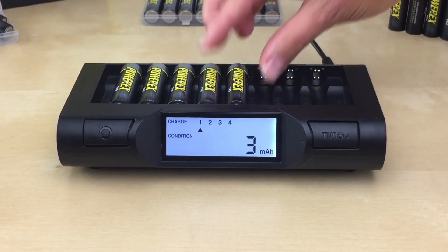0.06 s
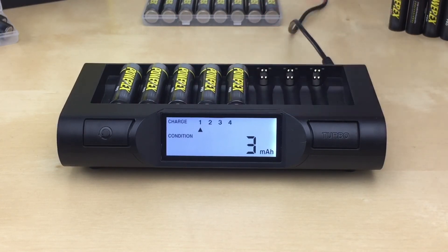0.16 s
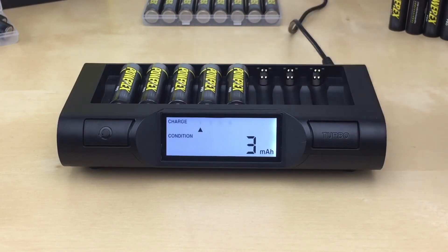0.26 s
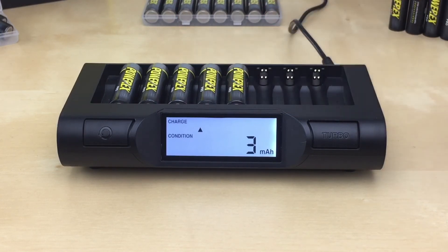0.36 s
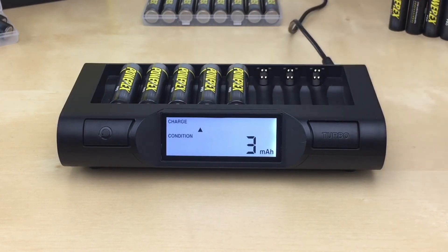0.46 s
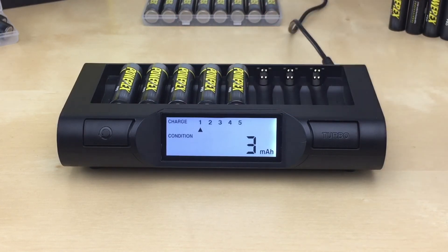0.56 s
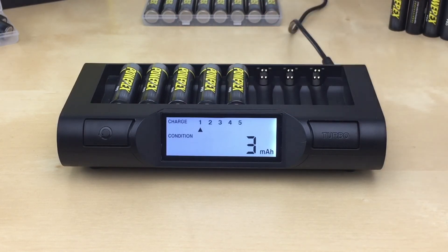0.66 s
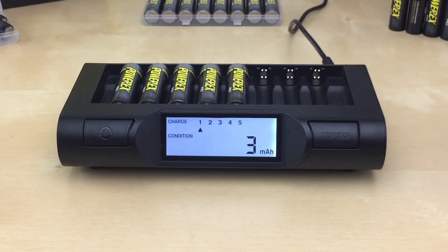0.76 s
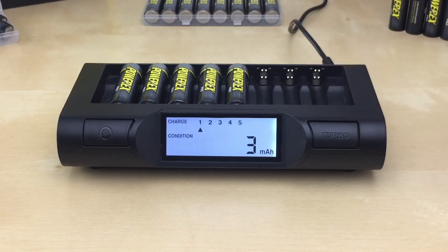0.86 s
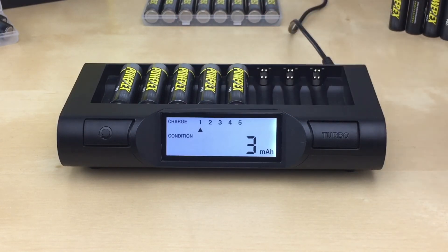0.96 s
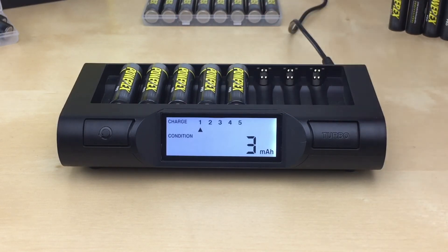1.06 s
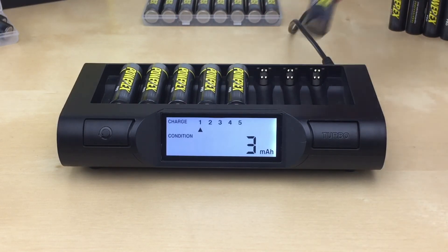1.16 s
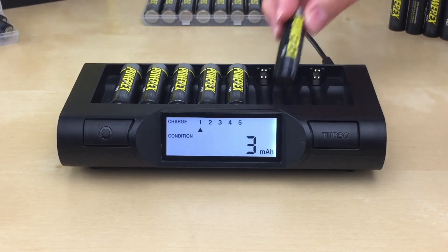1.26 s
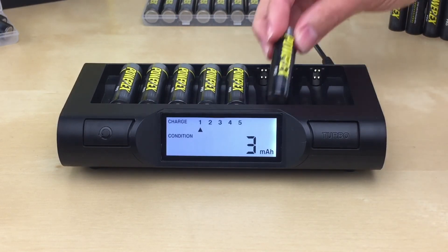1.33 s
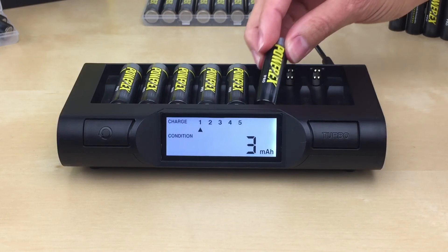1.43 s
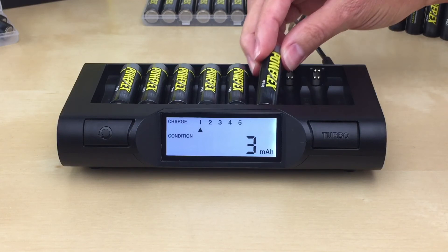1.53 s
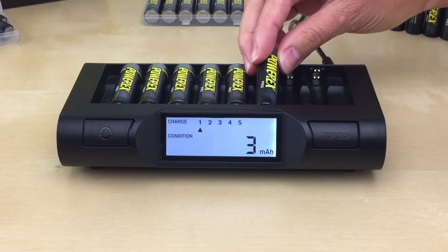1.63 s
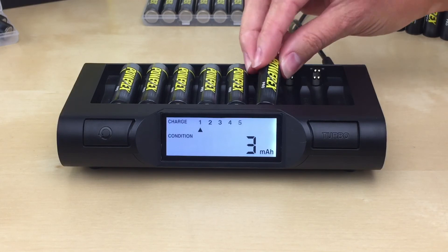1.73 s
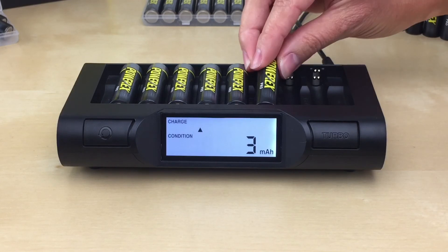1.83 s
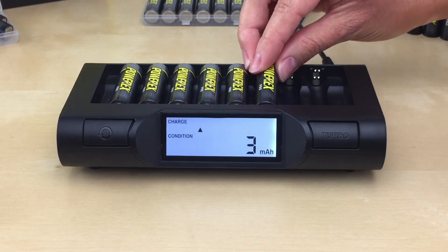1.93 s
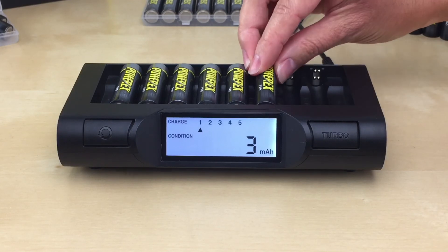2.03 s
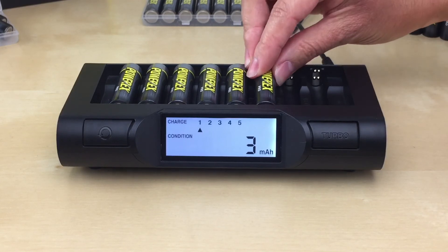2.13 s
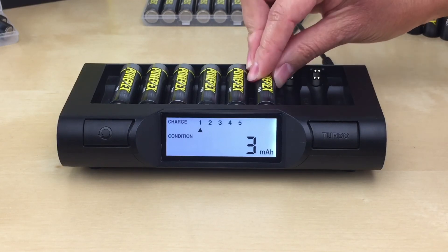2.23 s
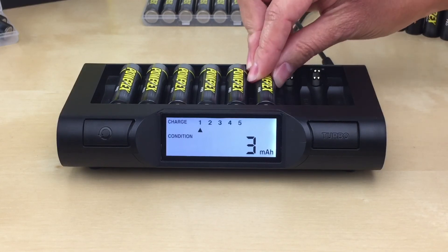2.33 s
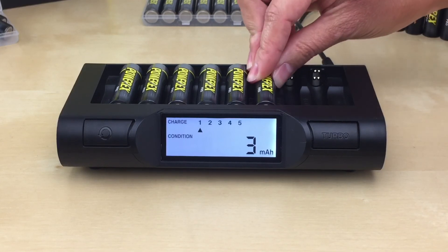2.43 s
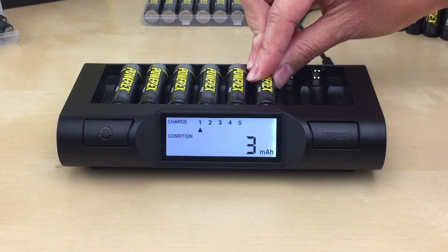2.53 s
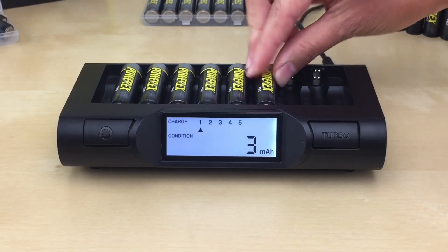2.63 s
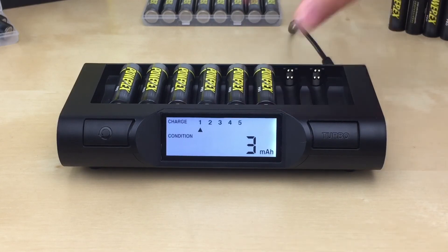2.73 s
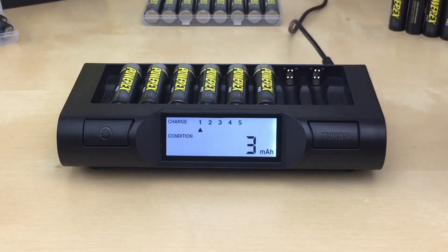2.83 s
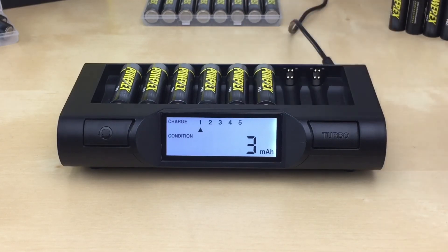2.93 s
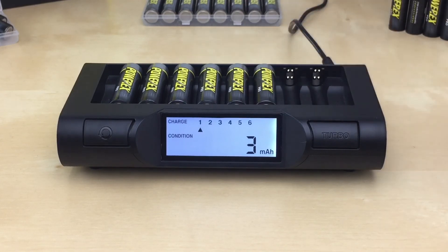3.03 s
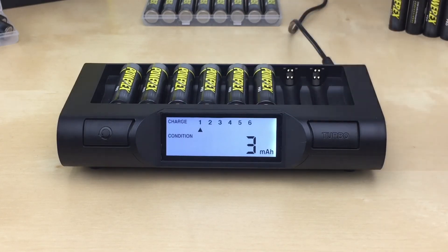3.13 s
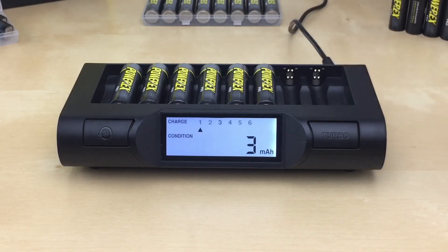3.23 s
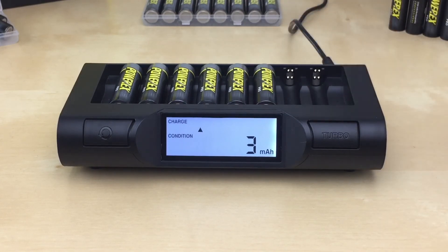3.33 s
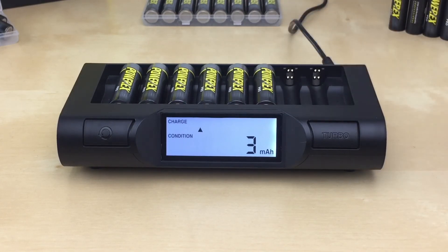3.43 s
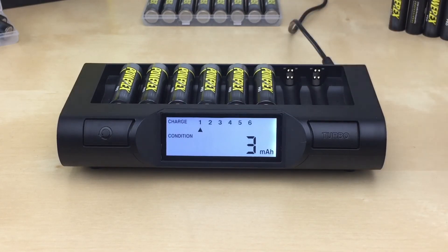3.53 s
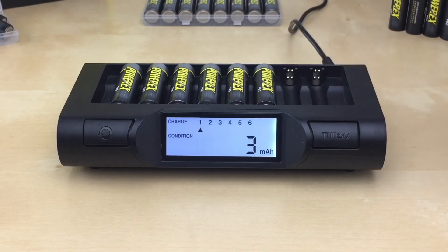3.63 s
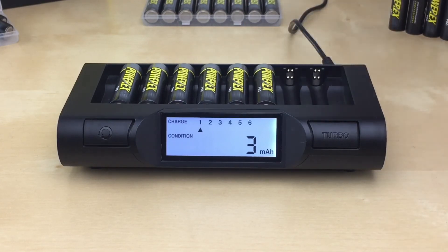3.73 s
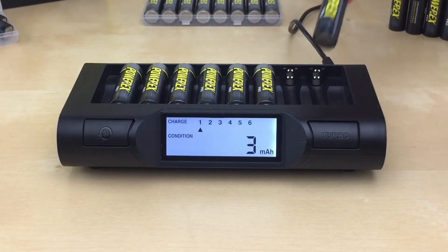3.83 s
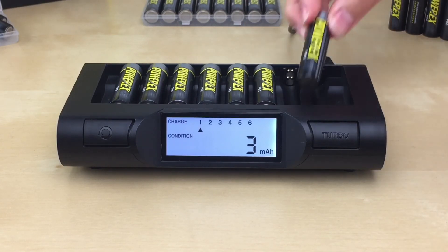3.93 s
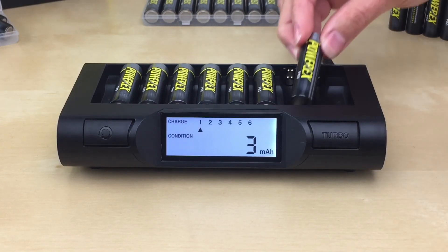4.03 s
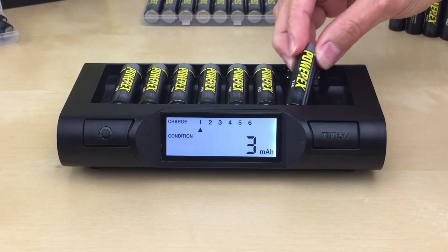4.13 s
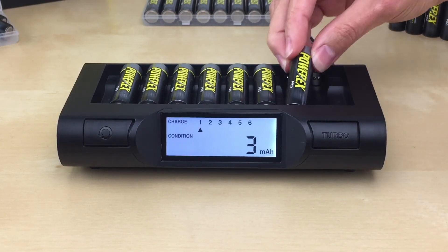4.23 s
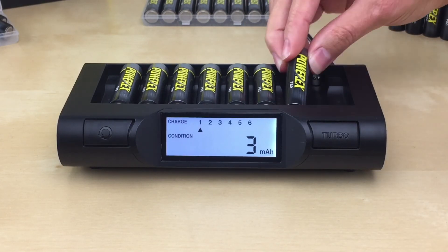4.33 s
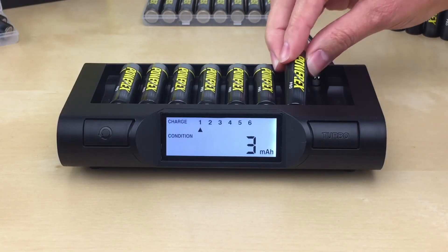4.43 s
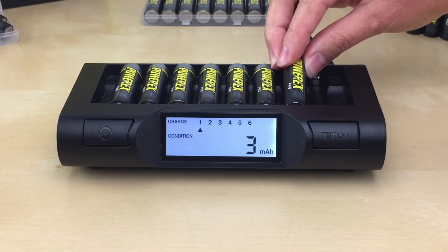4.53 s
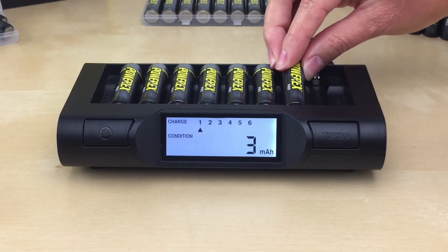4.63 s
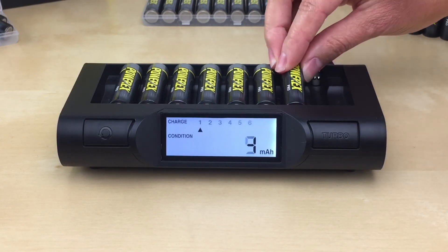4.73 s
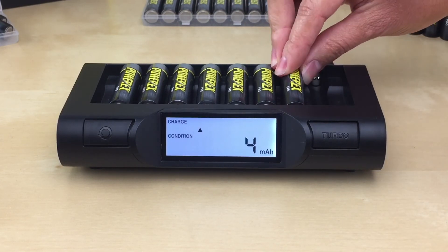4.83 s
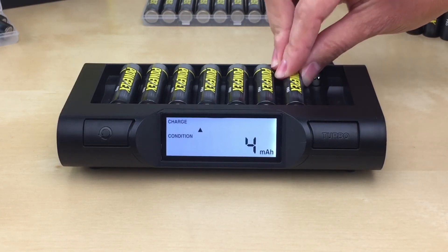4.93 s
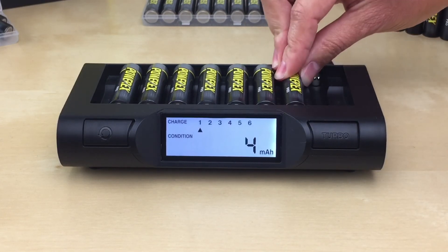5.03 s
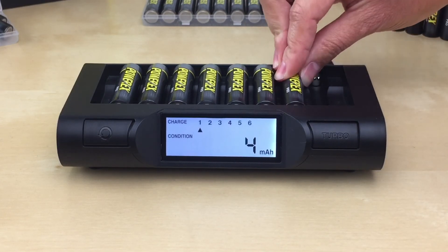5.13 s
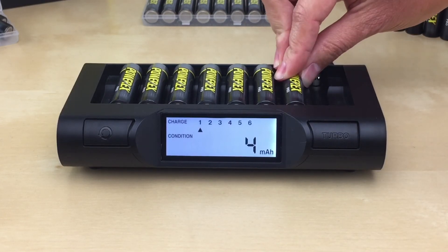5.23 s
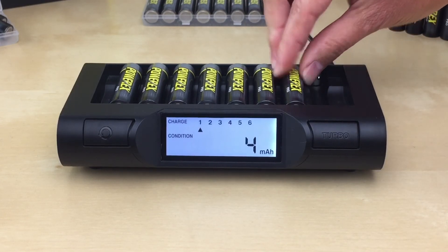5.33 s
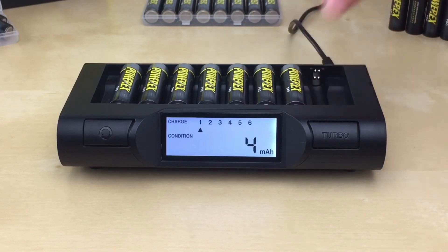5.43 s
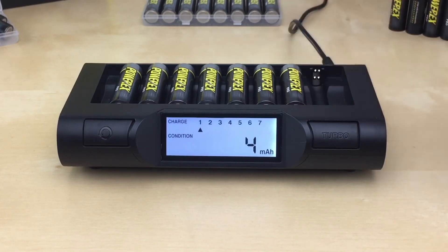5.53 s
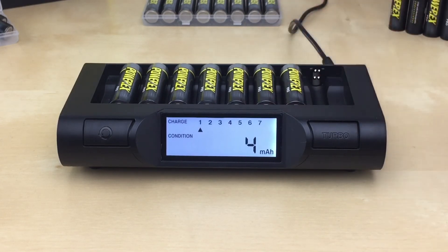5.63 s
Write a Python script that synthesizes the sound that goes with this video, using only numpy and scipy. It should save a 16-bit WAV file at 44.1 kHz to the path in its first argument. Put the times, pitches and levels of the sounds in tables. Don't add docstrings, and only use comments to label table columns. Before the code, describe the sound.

Small batteries click and snap into a plastic charger's spring contacts, with dull table thumps, over a steady faint fan whine and hiss.

```python
import sys
import numpy as np
from scipy import signal
from scipy.fft import rfft, irfft
from scipy.io import wavfile

SR = 44100
rng = np.random.default_rng(int(sys.argv[2]) if len(sys.argv) > 2 else 0)


def magnitude_from_level(level_db):
    exponent = np.asarray(level_db, float) / 20
    return 10 ** exponent


def transcribe(u):
    v = np.clip(np.atleast_2d(u).T, -1, 1)
    q = np.round(v * 32767).astype(np.int16)
    wavfile.write(sys.argv[1], SR, q)


N = 250488
TOP_CUT_HZ = 15820


def rms_one(x):
    return x / np.sqrt(np.mean(x ** 2) + 1e-20)


def ring(force, hz, t60):
    r = magnitude_from_level(-60 / (t60 * SR))
    w = 2 * np.pi * hz / SR
    return signal.lfilter([0, np.sin(w)], [1, -2 * r * np.cos(w), r * r], force + 1e-18)


def burst(seconds, rise_s, t60):
    t = np.arange(int(seconds * SR)) / SR
    rise = 1 - np.exp(-t / max(rise_s, 1e-4))
    fall_db = -60 * (t / np.clip(t60, .005, .4)) ** 1.123
    return rng.standard_normal(len(t)) * rise * magnitude_from_level(fall_db)


def drift(rate_hz):
    knots = rng.standard_normal(400)
    return np.interp(np.arange(N) / SR * rate_hz, np.arange(400), knots)


def in_time(rows):
    return np.interp(np.arange(N) / SR, *np.transpose(rows))


def band(x, low_hz, high_hz, order):
    return signal.sosfilt(signal.butter(order, [low_hz, high_hz], "band", fs=SR, output="sos"), x)


def high_pass(x, hz, order):
    return signal.sosfilt(signal.butter(order, hz, "high", fs=SR, output="sos"), x)


def add(out, sound, s):
    at = round(s * SR)
    out[at:at + len(sound)] += sound[:N - at]


def tick(mid_db, low_db, high_db, top_db, rattle_t60):
    case_modes = [780, 1050, 1400, 1950, 2280, 2750, 3370, 3900, 4500, 4950, 6300, 6960, 8100, 8900, 9500,
                  10600, 11600, 12800, 13700, 15000]
    edges = [680, 2500, 5400, 10500, 17500]
    rattle = burst(.15, 0.00013, rattle_t60)
    rattle[3] += 2.5
    luck_db = 1.2 * rng.standard_normal(len(case_modes))
    rattle += sum(magnitude_from_level(own_db - 27) * ring(rattle, hz, .005) for hz, own_db in zip(case_modes, luck_db))
    bands_db = (low_db + 4.5, 1.5, high_db + 0.21, top_db - .7)
    out = 0
    for low_hz, high_hz, rel_db in zip(edges, edges[1:], bands_db):
        out += magnitude_from_level(mid_db + rel_db) * band(rattle, low_hz, high_hz, 3)
    return out


def ticks():
    # [t/s, mid level/dB, low band against mid/dB, brightness/dB]
    touches = [(0.1592, -28.5, -8, -6.5), (0.4094, -68, 6, -14), (1.4221, -39.5, 4.5, -26),
               (1.5105, -61, 16, -15), (1.6158, -55.5, 3, 7), (2.1535, -42, -20, 5), (2.155, -50, 1, 0),
               (2.2739, -47.5, 4, -5), (2.4695, -55.5, -2, -16), (4.0936, -62.5, 11, -22),
               (4.1912, -50, -2, 5), (4.6156, -50.5, 2.5, -4), (4.8662, -44, -12, -0.5),
               (4.9836, -54.5, -13, -13), (5.0054, -43, -7, -9), (5.012, -46, -4, -17),
               (5.3787, -51.5, -12, 9.5), (5.4004, -60, 4, 7)]
    out = np.zeros(N)
    for s, mid_db, low_db, bright_db in touches:
        top_db = -3 + 1.3 * bright_db
        rattle_t60 = .031 - .0008 * bright_db
        add(out, tick(mid_db, low_db, bright_db, top_db, rattle_t60), s)
    return out


def rings():
    # [t/s, level/dB, f/Hz]
    caps = [(0.1582, -33, 1300), (1.423, -36, 580), (1.424, -31.5, 820), (.161, -35, 856),
            (0.161, -35, 4940), (1.425, -48, 2000), (1.511, -30, 900), (1.512, -37, 1500),
            (2.153, -44, 11500), (2.154, -37, 4500), (2.154, -38, 5050), (2.156, -35, 760),
            (2.153, -37, 7050), (2.157, -37, 577), (2.274, -57, 12200), (2.2755, -29, 760),
            (4.191, -43, 3900), (4.192, -52, 8300), (4.192, -50, 9960), (4.868, -52, 11550),
            (4.868, -45, 7100), (4.985, -58, 6960), (5.013, -31, 758), (5.01, -41, 3500),
            (5.008, -48, 7050)]
    # [t/s, level/dB, f/Hz]
    springs = [
        (0.1598, -31, 3400),
        (2.276, -44, 4300),
        (4.097, -48.5, 2300),
        (5.012, -41, 4500),
    ]
    # 38 ms at 1 kHz, higher parts die sooner
    parts = [(s, level_db, hz, .038 * (hz / 1000) ** -.36) for s, level_db, hz in caps]
    parts += [(s, level_db, hz, .047) for s, level_db, hz in springs]
    out = np.zeros(N)
    for s, level_db, hz, t60 in parts:
        rung = ring(burst(.2, 0.00028, 0.009), hz, t60)
        add(out, magnitude_from_level(level_db) * rung / np.abs(rung).max(), s)
    return high_pass(out, 520, 3)


def table_thumps():
    # [f/Hz, level/dB, t60/s]
    mode_groups = [
        [(52, -2, 0.21), (69.6, 6, .15)],
        [(92, -4.5, 0.064), (115.8, -2.5, 0.088)],
        [(143.3, 3.5, 0.18), (148, -6, 0.031)],
        [(213.7, 4, 0.25), (237, -12, 0.21)],
        [(281, -3, 0.11), (337.3, -2.5, 0.09), (432, -9, 0.075), (490, -18, 0.12), (568, 3.5, 0.05)],
    ]
    # [t/s, main mode level/dB, heft on low modes/dB, edge on upper modes/dB]
    knocks = [
        (1.423, -24, -42, -5),
        (1.466, -42, -22, 4),
        (1.51, -39.5, 1, -10),
        (1.809, -43, -10, -5),
        (2.154, -33.5, 2, -9),
        (2.278, -30, 7, -9),
        (4.097, -32.5, -38, -14.5),
        (4.618, -37.5, -6, -6),
        (5.005, -45.5, 18, -1.5),
    ]
    # [t/s, main mode level/dB, heft on low modes/dB, edge on upper modes/dB]
    nudges = [(0.107, -46.5, -27, -8), (1.62, -44, -15, -5), (1.929, -73, 12, 5), (1.99, -60, 6, -5),
              (2.099, -55.5, 8, 3), (2.319, -47, -4, -2.5), (2.429, -60, 0, -4), (2.721, -52.5, -20, -14),
              (4.182, -42, -20, -12), (4.258, -59, -12, 11), (4.343, -56.5, -15, -13), (4.735, -50, 0, -8),
              (4.795, -46.5, -12, -12), (4.855, -46.5, 2, -3), (5.036, -57, 13, 9), (5.128, -58, 13, -9),
              (5.409, -54, -4, -12)]
    out = np.zeros(N)
    for pushes, case_db, contact_s in ((knocks, -19, .001), (nudges, -28, .0035)):
        contact = np.hanning(round(contact_s * SR))
        for s, main_db, heft_db, edge_db in pushes:
            force = magnitude_from_level(-37) * burst(.6, 0.0058, .32)
            force[:len(contact)] += contact / contact.sum()
            deep_db = main_db - 11 + .55 * heft_db
            strongest_db = main_db + .4 * max(heft_db, 0)
            shell_db = case_db + .55 * strongest_db
            groups_db = (deep_db, main_db + heft_db, main_db, main_db + edge_db, shell_db)
            for modes, group_db in zip(mode_groups, groups_db):
                thump = sum(magnitude_from_level(group_db + level_db - 2) * ring(force, hz, t60) for hz, level_db, t60 in modes)
                add(out, band(thump, 0.62 * modes[0][0], 520, 2), s)
    return out


def slides():
    # [t/s, length/s, level/dB]
    strokes = [
        (.13, 0.047, -65),
        (1.396, 0.056, -57.5),
        (1.473, 0.07, -65),
        (2.133, .03, -63),
        (2.273, 0.035, -60),
        (4.181, .015, -58),
        (4.845, 0.036, -61),
        (4.978, 0.066, -60),
        (5.347, .06, -68),
    ]
    t = np.arange(SR // 5) / SR
    out = np.zeros(N)
    for s, length, level_db in strokes:
        hiss, grain = rng.standard_normal((2, len(t)))
        stroke = np.sin(np.pi * np.clip(t / length, 0, 1)) ** 2
        add(out, magnitude_from_level(level_db + 5.8 * grain) * hiss * stroke, s)
    return band(out, 1500, 7000, 2)


def fan_tones():
    # [t/s, speed/turns per s]
    speed = [(0, 113.02), (.9, 112.84), (2.6, 112.57), (5.68, 112.32)]
    # [t/s, level/dB]
    whine = [(0, -71), (.2, -65.5), (.8, -63), (2.0, -66.5), (2.2, -57.5), (2.6, -60), (2.85, -70.5),
             (3.1, -60.5), (4.0, -64.5), (5.3, -60), (5.42, -66.5), (5.68, -62)]
    orders = {1: -73, 2: -82.5, 11: -59, 14: -78.5, 15: -77, 18: -81.5, 20: -76.5, 22: -79.5}
    turn = 2 * np.pi * np.cumsum(in_time(speed)) / SR
    out = magnitude_from_level(in_time(whine) + 2.15 * drift(18)) * np.sin(19 * turn)
    for order, level_db in orders.items():
        flutter_db = 1.14 * drift(12)
        out += magnitude_from_level(level_db + flutter_db) * np.sin(order * turn + rng.uniform(0, 2 * np.pi))
    return np.sqrt(2) * out


def fan_air():
    # [f/Hz, density/dB per Hz]
    air = [(15, -63), (25, -20.5), (108, -14.5), (138, -21), (219, -17.5), (456, -20.5), (703, -3),
           (1180, -5.5), (1280, -7), (1500, -20), (1820, -17), (2080, -12.5), (2260, -17.5), (14300, -41),
           (16400, -40)]
    # [f/Hz, width/Hz, level/dB]
    housing = [(760, 84, 6.5), (900, 29, -7.5), (955, 56, 4), (1151, 60, -5.5), (1402, 21.3, 10.5),
               (1570, 40, 4), (1760, 40, -3.5), (2008, 23, 6.5), (2740, 42, 0), (3330, 30, 4.5),
               (3590, 33, 3.5), (4500, 96, 4)]
    hz = np.maximum(np.fft.rfftfreq(N, 1 / SR), 1)
    air_hz, air_db = np.transpose(air)
    colour_db = np.interp(np.log(hz), np.log(air_hz), air_db)
    for centre_hz, width_hz, lift_db in housing:
        colour_db += lift_db * np.exp(-.5 * ((hz - centre_hz) / width_hz) ** 2)
    noise = rng.standard_normal(N) * magnitude_from_level(1.38 * drift(25) + 0.13 * drift(2.64))
    spectrum = rfft(noise) * magnitude_from_level(colour_db) * (hz < TOP_CUT_HZ)
    return magnitude_from_level(-52.5) * rms_one(irfft(spectrum, N))


def whistles():
    # [f/Hz, width/Hz, level at start/dB, level at end/dB]
    lines = [(11600, 25, -100, -102), (11650, 25, -91, -98), (13600, 36, -99, -95), (14490, 20, -97, -89)]
    out = 0
    for hz, width_hz, first_db, last_db in lines:
        line = rms_one(ring(rng.standard_normal(N), hz, 1.5 / width_hz))
        out += magnitude_from_level(np.linspace(first_db, last_db, N) + 3.5 * drift(2.0)) * line
    return out


def room(x):
    t = np.arange(SR // 2) / SR
    t60 = .13
    tail = rng.standard_normal(len(t)) * magnitude_from_level(-60 * t / t60) * (t > .004)
    tail = signal.lfilter([1], [1, -.65], tail)
    return signal.fftconvolve(x, tail / np.sqrt(np.sum(tail ** 2)))[:N]


def scene():
    clicks = ticks() + slides()
    handling = clicks + magnitude_from_level(-13.5) * room(clicks) + rings() + table_thumps()
    charger = fan_tones() + fan_air() + whistles()
    return (handling + charger)[None]


def low_pass(x):
    return signal.sosfilt(signal.butter(12, 16510, fs=SR, output="sos"), x)


def record(dry):
    miked = high_pass(dry, 34, 4)
    top_cut = signal.cheby2(10, 40, TOP_CUT_HZ + 900, fs=SR, output="sos")
    return low_pass(signal.sosfilt(top_cut, miked))


dry = scene()
out = record(dry)
transcribe(out)
```